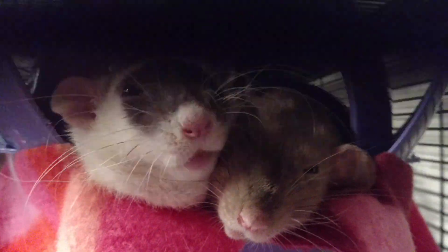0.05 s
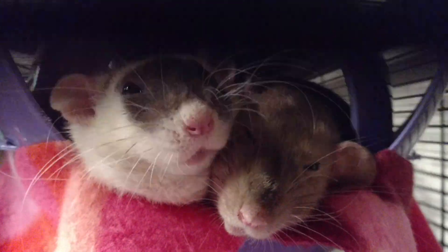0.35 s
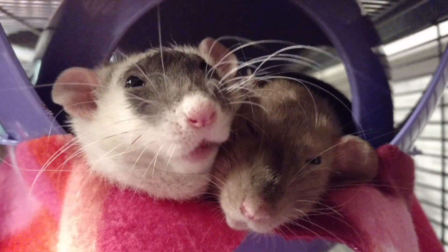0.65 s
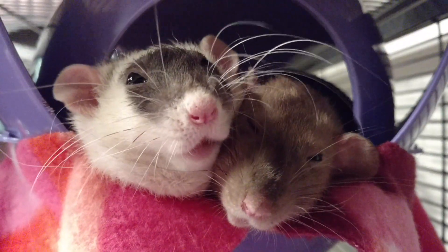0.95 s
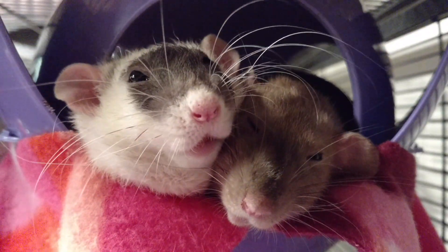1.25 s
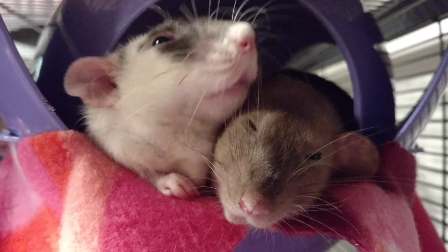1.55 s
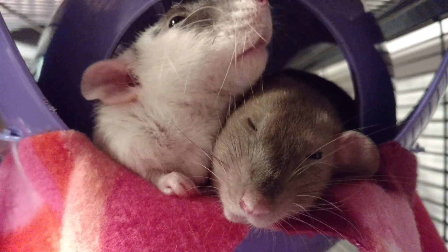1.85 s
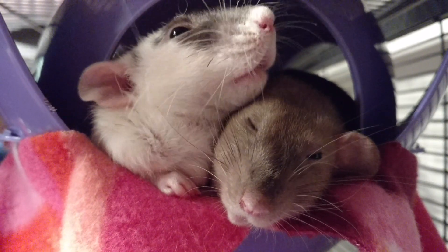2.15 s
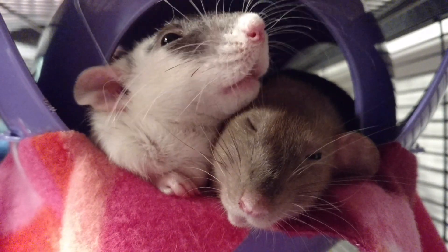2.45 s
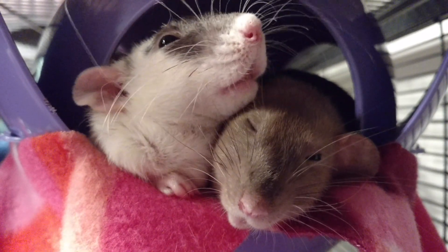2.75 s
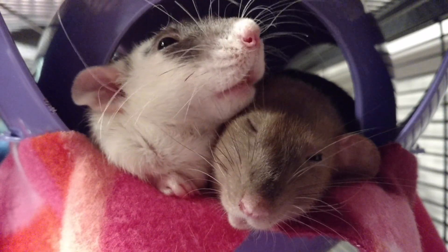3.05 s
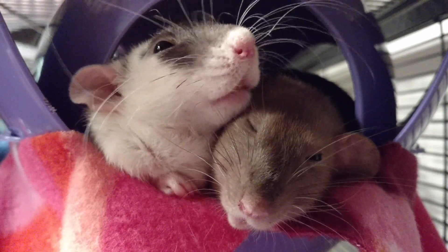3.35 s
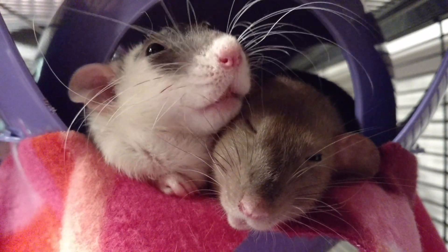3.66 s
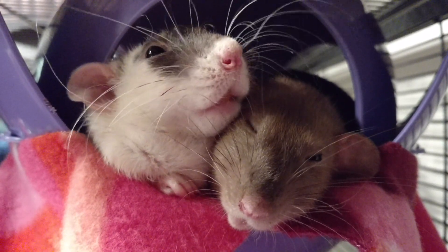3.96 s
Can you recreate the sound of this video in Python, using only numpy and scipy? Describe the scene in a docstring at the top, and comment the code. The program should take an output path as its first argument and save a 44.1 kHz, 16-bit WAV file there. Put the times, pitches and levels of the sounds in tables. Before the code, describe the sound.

Small, sharp clicks and rasps of a rat's teeth, close up, with steady fan noise behind.

```python
"""Two rats in a plastic hideout

Close to the microphone, one rat grinds its teeth in sharp ticks and short rasps; small movements
rustle, tap and knock on the shelter. Behind them a fan rumbles and hums, and the electronics hiss
and whine faintly. The recorder widens the stereo image by feeding each microphone, late and
inverted, to the other side."""
import sys
import numpy as np
from scipy import signal
from scipy.fft import rfft, irfft
from scipy.io import wavfile

SR = 44100
rng = np.random.default_rng(int(sys.argv[2]) if len(sys.argv) > 2 else 0)


def put_to_file(sound):
    """Save the sound as 16-bit audio at rate SR, in the file named by the first command-line argument."""
    columns = np.atleast_2d(sound).T  # one column per channel
    safe = np.clip(columns, -1, 1)
    whole_steps = np.round(safe * 32767)
    wavfile.write(sys.argv[1], SR, whole_steps.astype(np.int16))


N = 176400
T = np.arange(N) / SR
CLICK_T = np.arange(2048) / SR
BINS_HZ = np.maximum(np.arange(N // 2 + 1) * SR / N, 1)


def from_db(db):
    """Decibels to gain."""
    return 10 ** (np.asarray(db) / 20)


def unit_rms(x):
    """Scale to rms 1."""
    return x / np.sqrt(np.mean(x ** 2) + 1e-20)


def unit_energy(x):
    """Scale each channel to energy 1."""
    return x / np.sqrt(np.sum(x ** 2, axis=-1, keepdims=True) + 1e-20)


def pan(db):
    """Left and right gains; positive is to the right."""
    return from_db(np.array([[-1], [1]]) * db)


def over_hz(points):
    """A table read along log frequency."""
    hz, value = np.transpose(points)
    return np.interp(np.log(BINS_HZ), np.log(hz), value)


def drift(rate_hz):
    """A slow random wander with rms 1."""
    return unit_rms(irfft(rfft(rng.standard_normal(N)) / (1 + (BINS_HZ / rate_hz) ** 2), N))


def resonate(x, hz, q):
    """A two-pole resonance with gain 1 at its peak."""
    return signal.lfilter(*signal.iirpeak(hz, q, fs=SR), x)


def add(out, start_s, sound):
    """Mix a sound in at a time."""
    i = int(start_s * SR)
    out[:, i:i + sound.shape[-1]] += sound[..., :N - i]


def grit(envelope):
    """Stereo noise under an envelope, energy 1 a side."""
    return unit_energy(rng.standard_normal((2, len(CLICK_T))) * envelope)


def in_hideout(contact, tail_db=-8.5, decay_s=.004):
    """A contact followed by its short patter of reflections off the walls."""
    return unit_energy(contact) + from_db(tail_db) * grit(np.exp(-CLICK_T / decay_s))


def at_level(click, db):
    """Give a click the energy of one millisecond at this level."""
    return from_db(db) * unit_energy(click) * np.sqrt(SR / 1000)


# Spectrum of the fan's air noise: f/Hz, relative level/dB
FAN_AIR = [(24, -35), (42, -13.5), (80, -3), (125, -1), (160, -1.5), (270, 1.5), (480, -0.5), (650, -10),
           (1000, -15), (1500, -30), (3000, -64)]
# Fan and mains hum lines: f/Hz, left level/dB, right level/dB, phase between the sides/rad
HUM_LINES = [(59, -69, -75, 1), (118.74, -61.5, -67.5, 0.85), (189.2, -63, -58, 1.22),
             (235, -59, -58.5, .64), (356.3, -53, -54, 1.55)]

def fan(air_db=-51.5, coherence=.53, waver_db=1.9, wander_rad=.45):
    """Behind the hideout: low air noise, partly alike at both microphones, and wavering hum."""
    white = rng.standard_normal((3, N))
    air = np.sqrt(coherence) * white[0] + np.sqrt(1 - coherence) * white[1:]
    rumble = unit_rms(irfft(rfft(air) * from_db(over_hz(FAN_AIR)), N))
    out = from_db(air_db) * pan(2) * rumble
    for hz, left_db, right_db, apart in HUM_LINES:
        phase = 2 * np.pi * hz * T + wander_rad * drift(rate_hz=1.6)
        sides = np.array([from_db(left_db) * np.sin(phase), from_db(right_db) * np.sin(phase + apart)])
        out += np.sqrt(2) * from_db(waver_db * drift(rate_hz=8.8)) * sides
    return out


# Spectrum of the microphones' self-noise: f/Hz, relative level/dB
MIC_NOISE = [(500, -5), (1400, 7.5), (2200, -1.5), (2900, 0), (3700, 6), (4800, 3), (6700, 5.5),
             (8200, 2.5), (9400, 1), (10200, -9), (10800, -2), (12200, -0.5), (13000, 2), (14300, -5),
             (15000, -3)]

def hiss(level_db=-58.5, top_hz=15300):
    """Each microphone's own noise; the treble leans slightly right."""
    lean = pan(.5 / (1 + (1800 / BINS_HZ) ** 6))
    lowpass = 1 / (1 + (BINS_HZ / top_hz) ** 100)
    spectrum = rfft(rng.standard_normal((2, N))) * from_db(over_hz(MIC_NOISE))
    return from_db(level_db) * unit_rms(irfft(spectrum * lean * lowpass, N))


def rustle(level_db=-68.5, swing_db=4.5):
    """Fur and whiskers brush near the microphone, faint and bright, swelling at random."""
    brush = unit_rms(resonate(rng.standard_normal((2, N)), hz=8100, q=1))
    return brush * from_db(level_db + swing_db * np.minimum(drift(rate_hz=9), 2))


def tones(lines):
    """Nearly steady sines at their rms levels."""
    return sum(from_db(db) * np.sqrt(2) * np.sin(2 * np.pi * hz * T + .13 * drift(rate_hz=3.4))
               for hz, db in lines)


# Thin electronic whine: f/Hz, relative level/dB
WHINE_LINES = [(8985, -83), (9270, -83), (9411, -80), (9554, -76), (9982, -86)]
# Lower electronic whistle: f/Hz, relative level/dB
WHISTLE_LINES = [(6762, -72), (7581, -78)]
# When the whistle sounds: start t/s, end t/s
WHISTLE_SPANS = [(0, .3), (2.35, 2.6), (3.15, 3.8)]

def electronics(drop_s=2.85, drop_db=8):
    """A whine in the left channel that steps down, and an on-and-off whistle to the right."""
    whine = tones(WHINE_LINES) * from_db(6 - drop_db * (T > drop_s)) * np.array([[1], [0]])
    on = sum((T >= start) & (T < end) for start, end in WHISTLE_SPANS)
    whistle = tones(WHISTLE_LINES) * on * from_db(-.3) * pan(3)
    return whine + whistle


# Soft knocks on the shelter: t/s, relative level/dB, factor on the ring time
SHELTER_KNOCKS = [(0.0115, -29.5, 1), (.0320, -37, .3), (.2070, -33.5, 1.6), (1.5985, -39, .7)]
# The shelter's low modes: f/Hz, relative level/dB, t60/s
SHELTER_MODES = [(571, -7.5, 0.084), (648, 1.5, 0.01), (503, -14, 0.035), (644, -18, .11)]

def knocks(contact_s=.00091, crack_db=-5.5):
    """Close, on the right: a small crack, then the shelter's modes swell over the contact and die."""
    out = np.zeros((2, N))
    t = T[:SR // 5]
    swell = 1 - np.exp(-(t / contact_s) ** 2)
    crack = from_db(crack_db) * np.exp(-t / .0001)
    for start_s, db, stretch in SHELTER_KNOCKS:
        ring = sum(from_db(mode_db - 60 * t / (t60 * stretch)) * np.sin(2 * np.pi * hz * t)
                   for hz, mode_db, t60 in SHELTER_MODES)
        add(out, start_s, from_db(db) * (ring * swell + crack) * pan(5.5))
    return out


# Incisors snapping past each other: t/s, relative level/dB, tooth f/Hz, bright edge gain/dB
TOOTH_TICKS = [(0.034, -44, 4180, -14), (0.2122, -36.5, 7350, -5), (.4330, -46, 7060, -16),
               (0.7537, -45.5, 6700, -24), (0.7583, -33.5, 5400, -11), (1.0496, -39, 4840, -10),
               (1.0732, -45, 7200, -28), (1.3941, -44, 6800, -24), (1.4328, -44, 6600, -13),
               (1.5114, -45.5, 5500, -8), (1.5966, -43, 4630, -22), (1.5989, -36.5, 4260, -27),
               (1.7137, -43.5, 7100, -24), (1.7923, -36.5, 6660, -6), (2.033, -44.5, 6260, -21),
               (2.1066, -49, 12000, -8), (2.3536, -45, 6900, -23), (2.673, -48.5, 6600, -20),
               (2.9929, -44.5, 6640, -27), (3.1091, -46.5, 7240, -12), (3.3268, -43, 5800, -7),
               (3.9522, -47, 7150, -17)]

def tooth_ticks(grit_s=.0007, top_hz=15000):
    """Close up, each snap is a gritty impulse that rings the tooth, its bright edge, head and jaw."""
    out = np.zeros((2, N))
    soften = signal.butter(1, top_hz, fs=SR, output="sos")
    for start_s, db, tooth_hz, edge_db in TOOTH_TICKS:
        snap = in_hideout((CLICK_T == 0) + 1.7 * grit(np.exp(-CLICK_T / grit_s)))
        tooth = resonate(snap, tooth_hz, q=3.4)
        edge = from_db(edge_db) * resonate(snap, hz=13600, q=3)
        head = from_db(-15) * resonate(snap, hz=3400, q=2.5)
        jaw = from_db(-9) * resonate(snap, hz=1400, q=1.5)
        tick = signal.sosfilt(soften, tooth - edge - head - jaw)
        add(out, start_s, at_level(tick, db + .3) * pan(1.5))
    return out


# Incisors scraping along each other: t/s, relative level/dB, length/s, bright edge gain/dB
TOOTH_RASPS = [(.060, -49, 0.0033, -10), (0.198, -47.5, 0.0019, 1), (0.6402, -31.5, .0016, 3),
               (0.644, -36.5, 0.0009, -6), (.686, -46, 0.0046, -2), (.8220, -50, .001, -2),
               (.8405, -37.5, 0.0037, -3), (0.8464, -42, 0.00097, -7), (0.867, -42, 0.0089, -2),
               (1, -46, 0.0082, -2), (2.22, -44, .002, 1), (3.471, -50, .005, 0), (3.847, -50, .005, 0)]
# Resonances of the scraped teeth: f/Hz, Q, gain/dB
TOOTH_MODES = [(3500, 3.6, -10), (6080, 6.7, 3), (7870, 6, 0.5)]

def tooth_rasps(slips_per_s=1800, slip_db=7, edge_hz=13200, low_hz=3000):
    """Close and central: milliseconds of catching and slipping friction ring the teeth."""
    out = np.zeros((2, N))
    low_cut = signal.butter(2, low_hz, "high", fs=SR, output="sos")
    for start_s, db, length_s, edge_db in TOOTH_RASPS:
        stroke = CLICK_T / length_s
        slips = from_db(slip_db * (rng.random(len(CLICK_T)) < slips_per_s / SR))
        friction = in_hideout(grit(slips * np.sqrt(stroke) * np.exp(-stroke ** 4)))
        ring = sum((-1) ** k * from_db(mode_db) * resonate(friction, hz, q)
                   for k, (hz, q, mode_db) in enumerate(TOOTH_MODES))
        edge = from_db(edge_db) * resonate(resonate(friction, edge_hz, q=3.5), edge_hz, q=1.75)
        rasp = signal.sosfilt(low_cut, ring - edge)
        add(out, start_s, at_level(rasp, db + 1.5))
    return out


# The rats shifting on their bedding: t/s, level/dB
BEDDING_SHUFFLES = [(.45, -52.5), (1.05, -53.5), (1.4, -57)]

def shuffles(hz=450, q=1.6, swell_s=.03):
    """Inside the hideout: soft, dull swells of fur on cloth."""
    rub = unit_rms(resonate(resonate(rng.standard_normal(N), hz, q), hz, q))
    swells = sum(from_db(db) * np.exp(-((T - peak_s) / swell_s) ** 2) for peak_s, db in BEDDING_SHUFFLES)
    return rub * swells


# Dry taps, as of a claw on the plastic: t/s, level/dB before panning
CLAW_TAPS = [(1.5989, -46), (2.2907, -37)]
# Short resonances of the tapped plastic: f/Hz, Q, gain/dB
PLASTIC_MODES = [(564, 2.2, 6), (920, 2.3, -2.5), (1460, 4, -2), (3560, 3.9, 0.5)]

def taps(top_hz=6050):
    """Close, on the left: each tap is one sharp pulse that briefly rings the plastic."""
    out = np.zeros((2, N))
    soften = signal.butter(2, top_hz, fs=SR, output="sos")
    for start_s, db in CLAW_TAPS:
        pulse = signal.sosfilt(soften, in_hideout(1. * (CLICK_T == 0)))
        ring = sum(from_db(mode_db) * resonate(pulse, hz, q) for hz, q, mode_db in PLASTIC_MODES)
        add(out, start_s, at_level(ring, db) * pan(-5))
    return out


# Slow sag in the level of fan, hiss and rustle: t/s, gain/dB
BACKGROUND_GAIN = [(0, 0.5), (1.4, -0.17), (2.75, -0.5), (2.9, -1.85), (3.4, -1), (4, -3)]

def scene():
    """Teeth and small movements in front, fan and electronics underneath."""
    sag = from_db(np.interp(T, *np.transpose(BACKGROUND_GAIN)))
    background = (fan() + hiss() + rustle()) * sag + electronics()
    return background + knocks() + tooth_ticks() + tooth_rasps() + shuffles() + taps()


# What each microphone feeds to the other side: f/Hz, share of the amplitude
CROSSFEED_SHARE = [(300, 0.015), (700, 0.85), (1100, 0.61), (2300, 1), (3500, 0.94), (4500, 0.68),
                   (6500, 0.11), (9000, 0.31), (13000, 0.28), (15300, 0.68)]

def record(dry, delay_s=.0004448, cutoff_hz=16300):
    """The recorder widens the image by delayed, inverted crossfeed, then cuts the top."""
    spectrum = rfft(dry)
    feed = over_hz(CROSSFEED_SHARE) * np.exp(-2j * np.pi * BINS_HZ * delay_s)
    wide = irfft(spectrum - feed * spectrum[::-1], N)
    return signal.sosfilt(signal.ellip(10, .2, 80, cutoff_hz, fs=SR, output="sos"), wide)


dry = scene()
out = record(dry)
put_to_file(out)
```